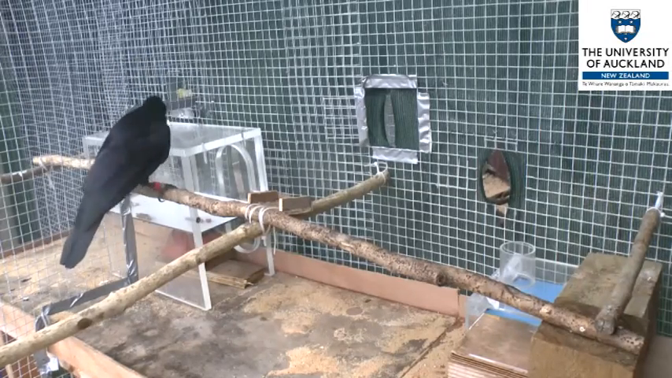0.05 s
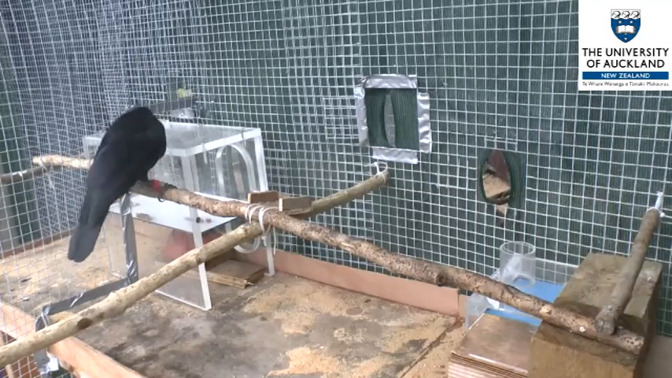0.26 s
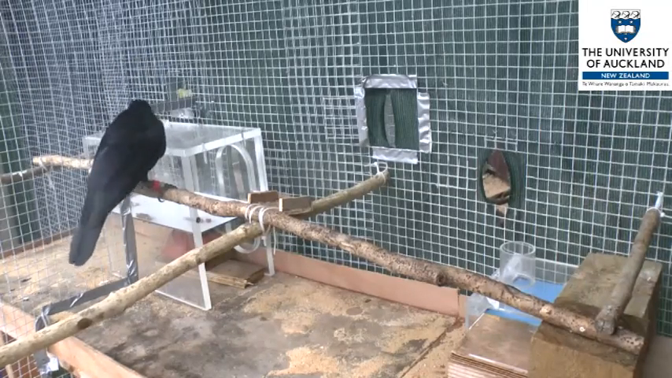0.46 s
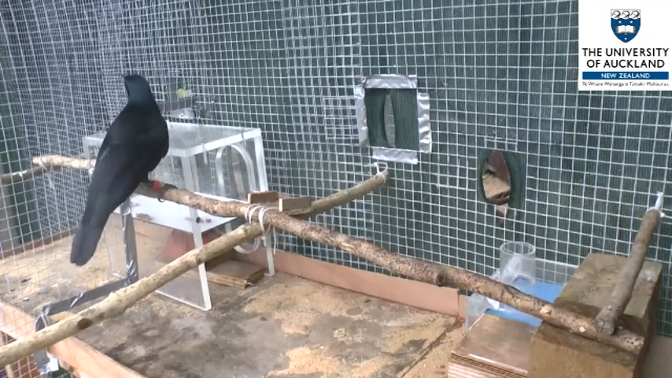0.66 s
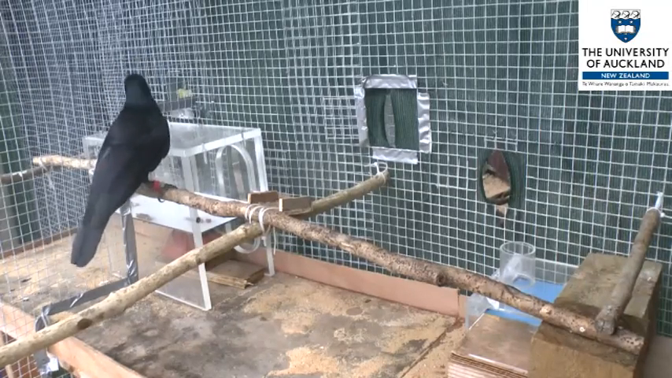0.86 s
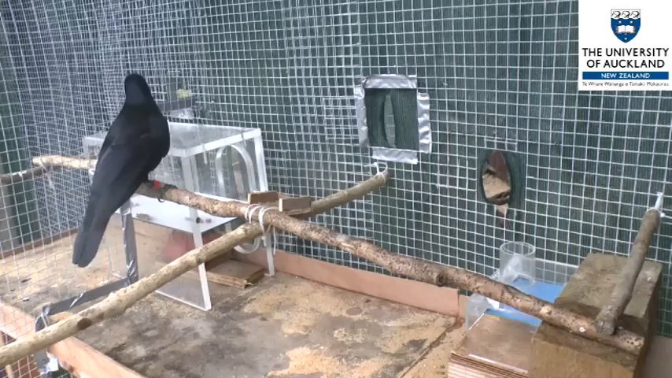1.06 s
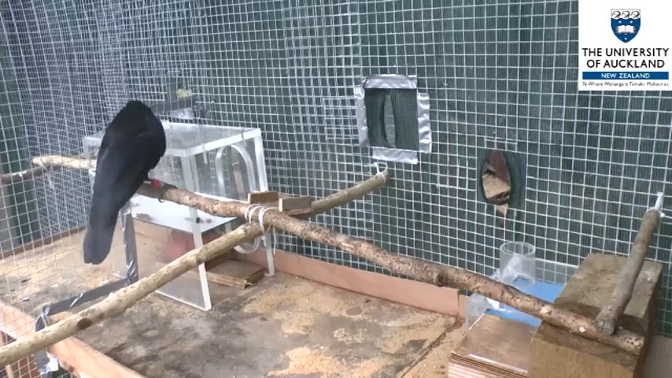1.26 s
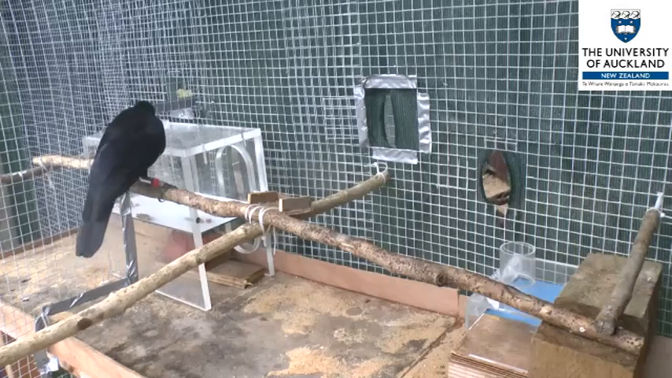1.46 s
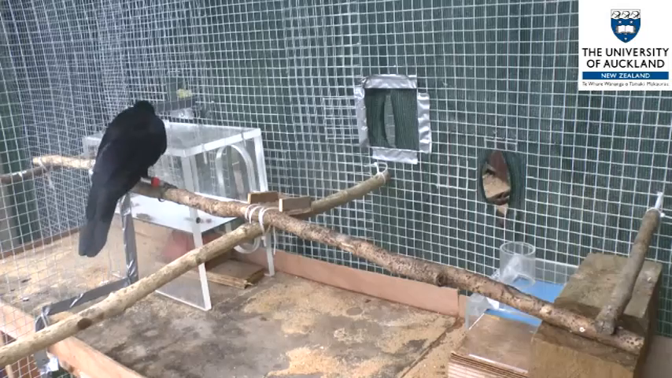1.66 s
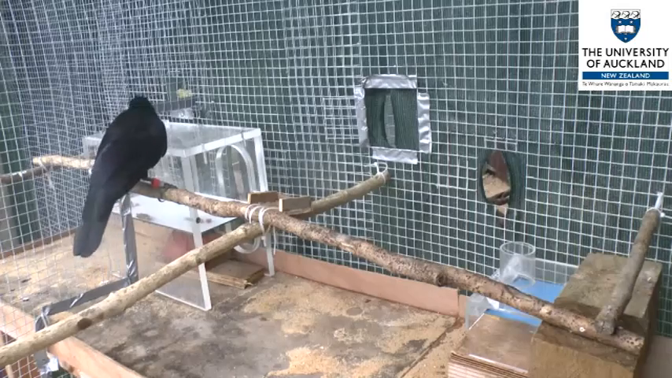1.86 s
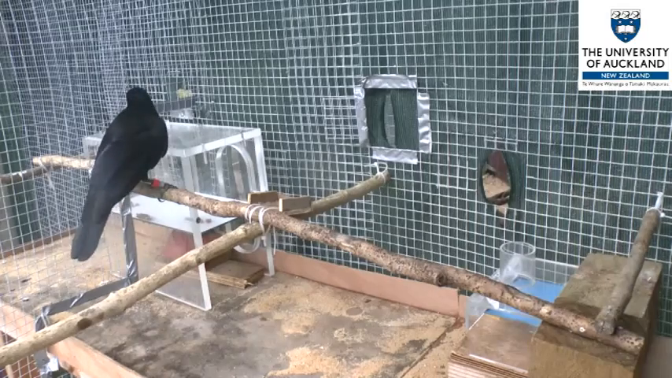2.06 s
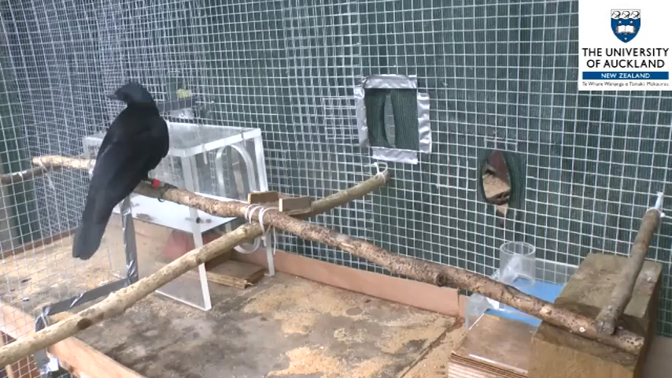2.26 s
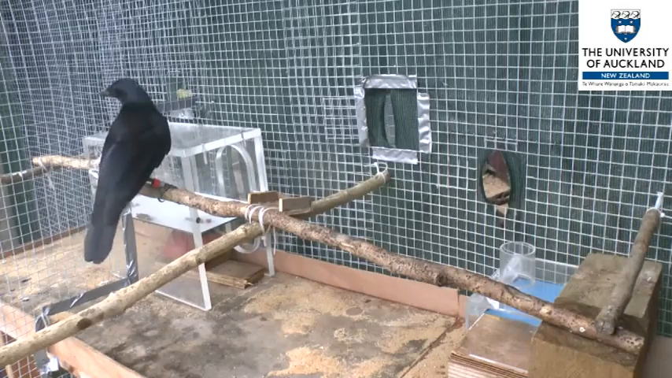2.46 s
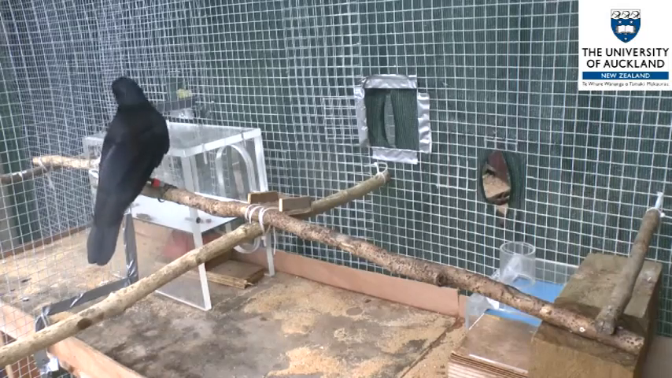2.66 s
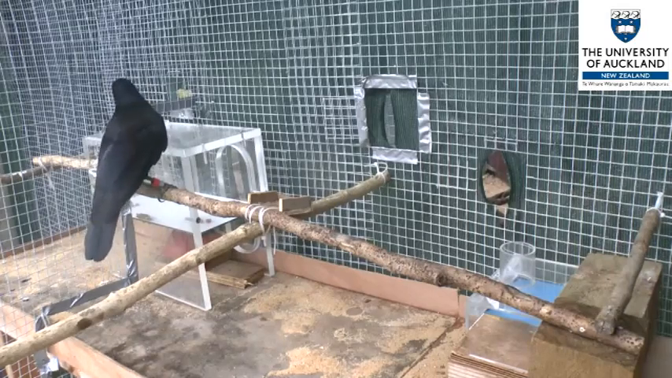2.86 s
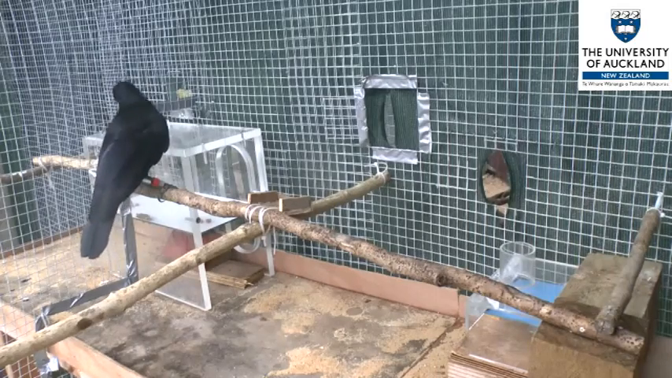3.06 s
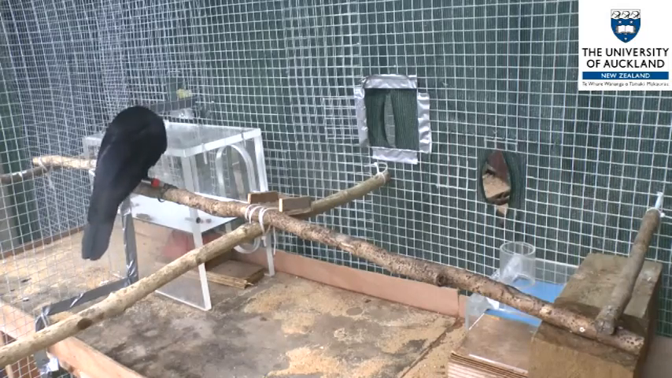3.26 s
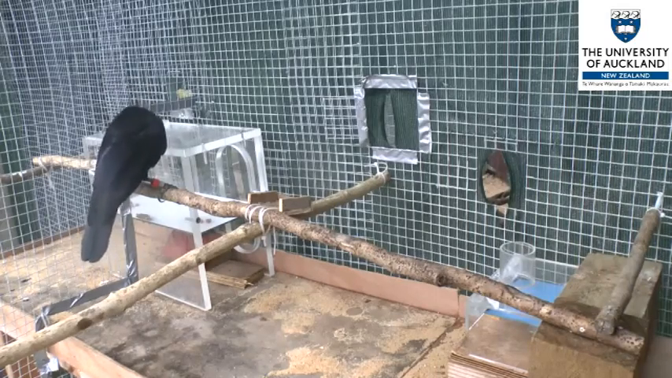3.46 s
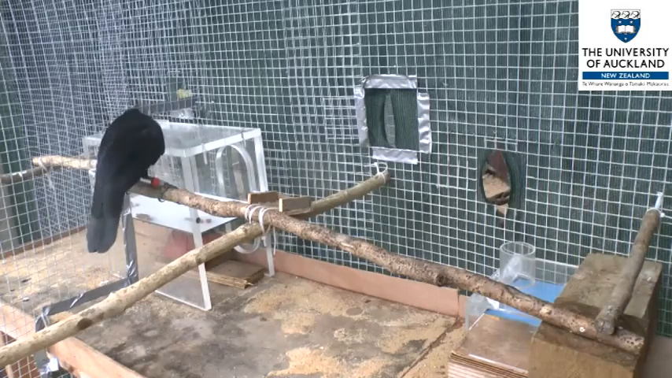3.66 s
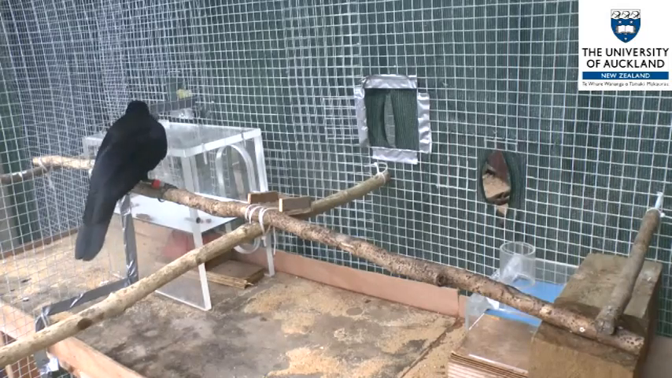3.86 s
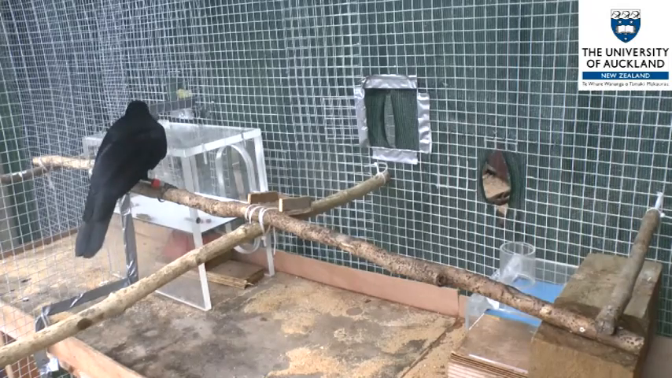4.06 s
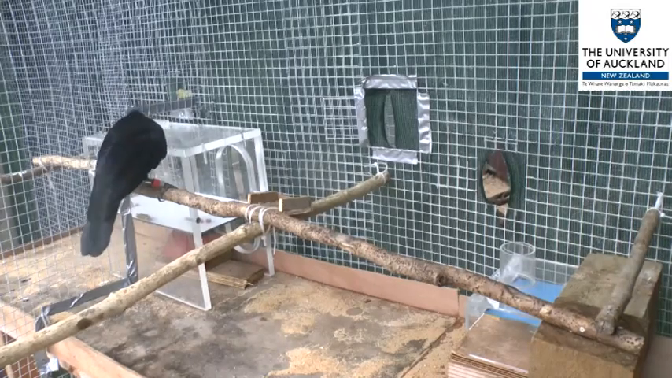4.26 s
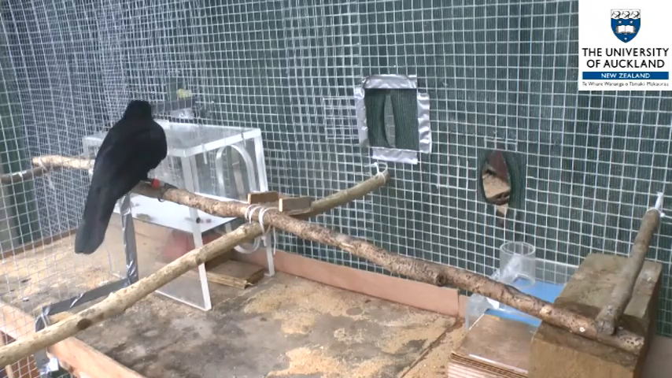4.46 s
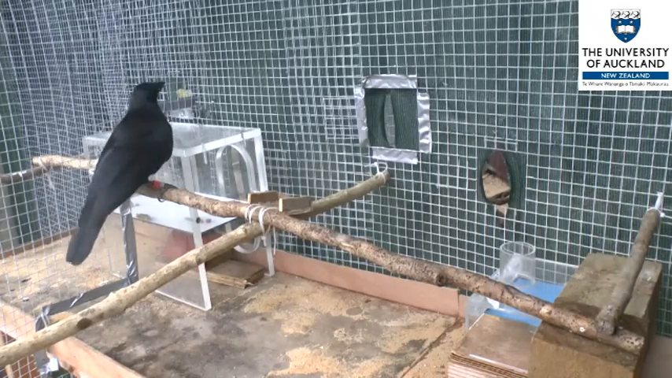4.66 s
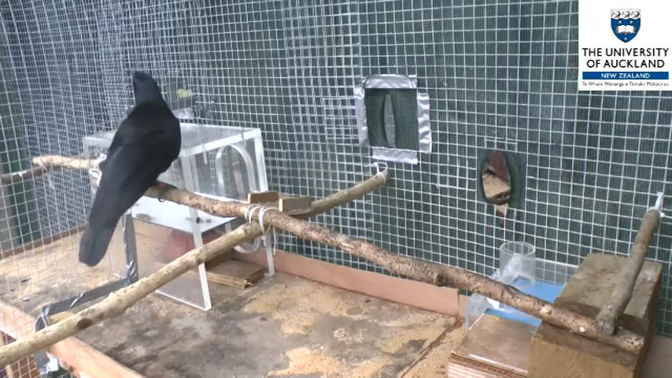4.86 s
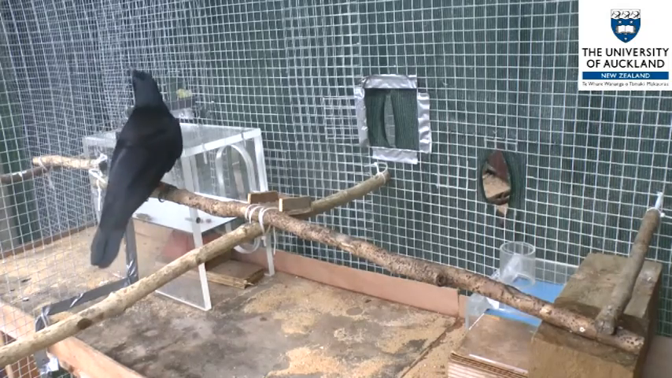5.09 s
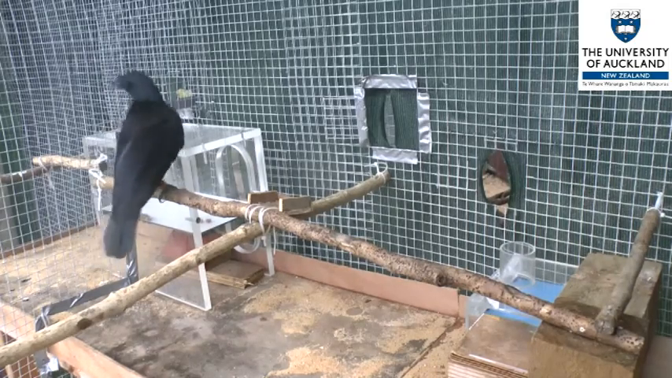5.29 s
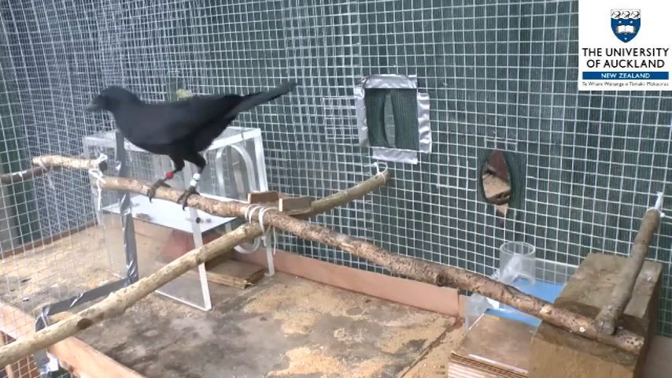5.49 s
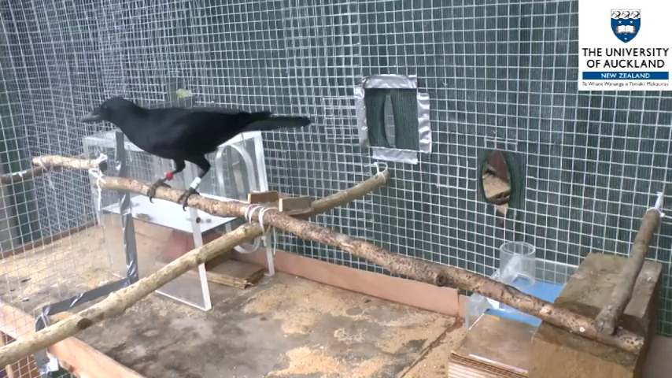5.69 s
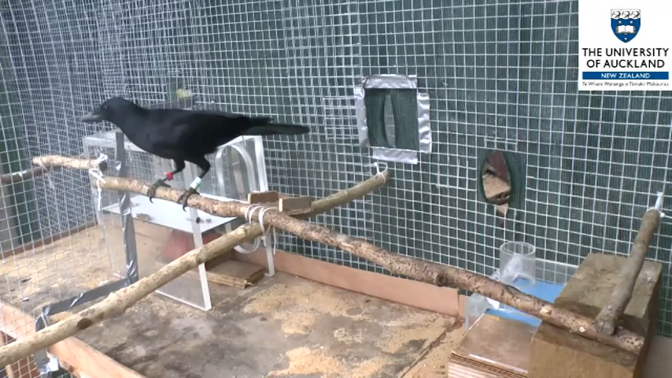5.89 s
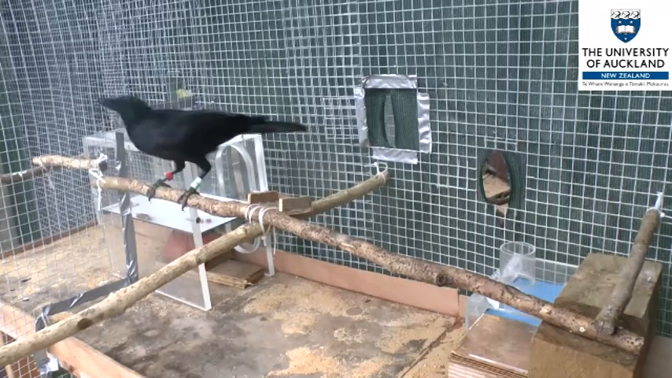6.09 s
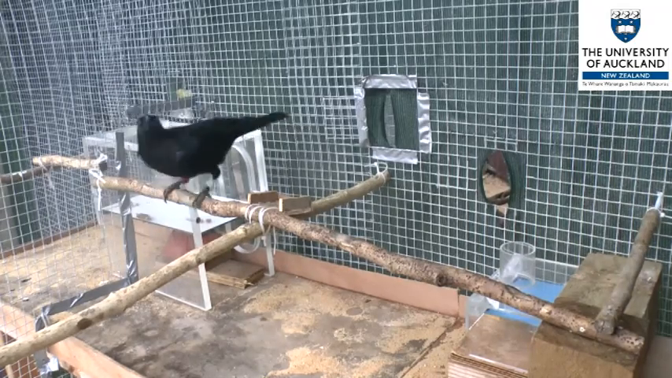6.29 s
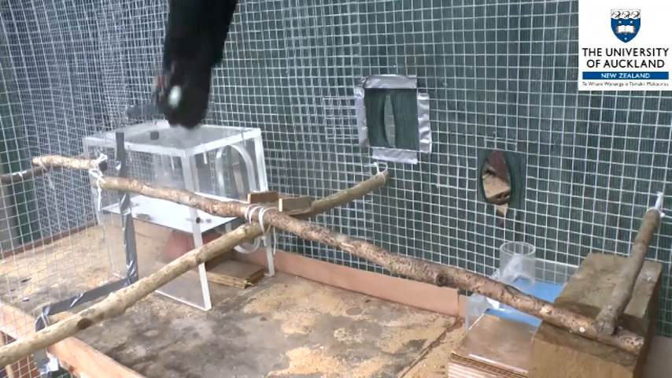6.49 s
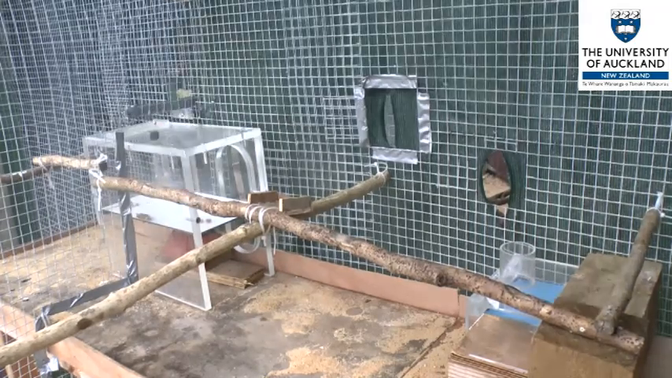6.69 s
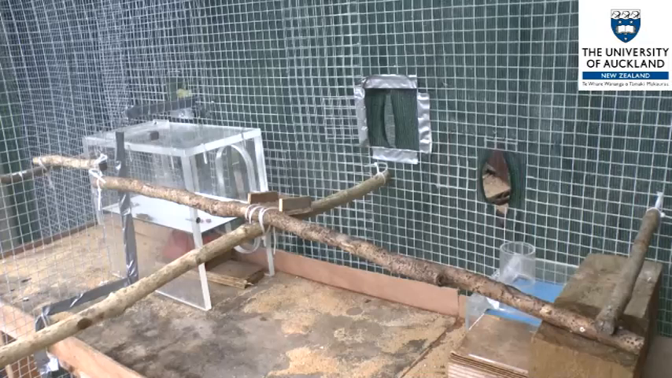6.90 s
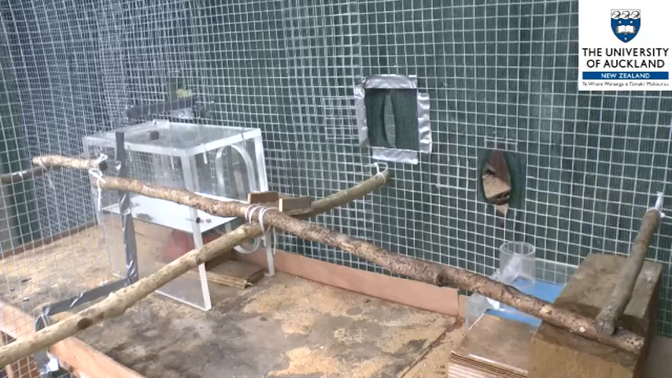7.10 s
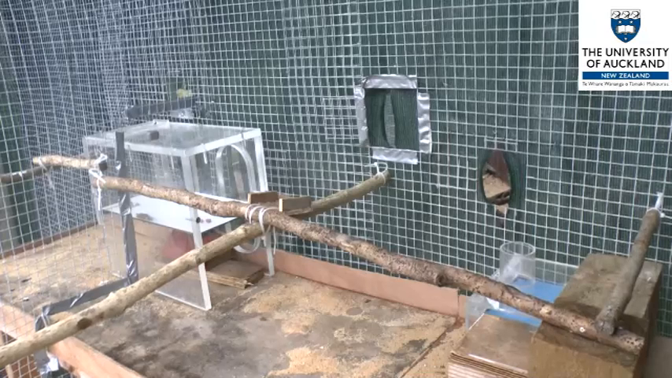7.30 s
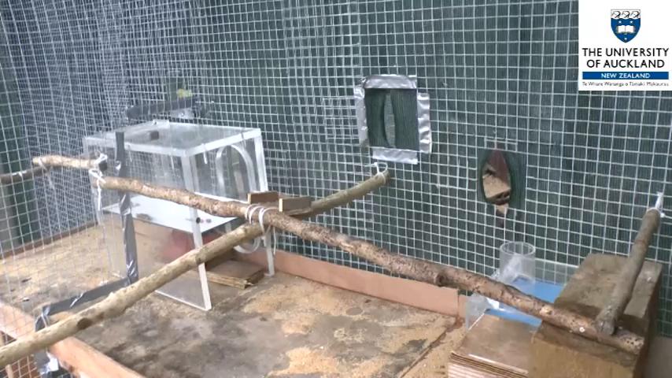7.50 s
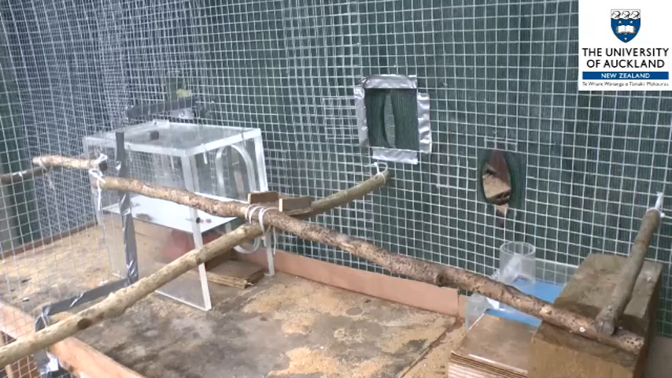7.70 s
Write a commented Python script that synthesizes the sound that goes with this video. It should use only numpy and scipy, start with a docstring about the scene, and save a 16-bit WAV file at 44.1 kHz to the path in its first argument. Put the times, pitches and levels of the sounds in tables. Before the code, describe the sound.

A close microphone in a small aviary with a short, light echo; behind everything lie soft air wash, a faint far drone in the first half, and a thin insect shimmer. A brief scrape opens, then two hard hollow raps on a plastic box at 0.3 s, with tiny taps after. Light claw ticks and a faint chirp come around 1.3-1.4 s. Strong knocks cluster at 1.8-2.0 s, then a quiet gap with faint distant chirps. From 3.4 to 3.6 s a quick rattling run of knocks and scraping, then one loud rap at 4.3 s and weaker taps. A distant whistle slides down at 4.5-4.85 s. At 5.0 and 5.4-5.7 s claws click, the perch thuds softly and feathers rustle. Wings swish from about 6.45 s; bright, crisp clatter, thumps and scuffs on wire mesh peak at 6.85, 7.18 and 7.35 s, then fade.

```python
"""Crow rattling a hollow box in an aviary

A crow taps and scrapes a hollow plastic box, whose modes ring at each knock, then flies to the wire mesh.
Claw ticks and feather rustle are shaped noise; landing thuds are noise that drives the timber frame's modes.
Behind it lie air noise, a far drone, a band of insects, faint chirps and a falling whistle (gliding tones).
Short random taps make the echo of the aviary."""
import sys
import numpy as np
from scipy import signal
from scipy.fft import rfft, irfft
from scipy.io import wavfile
from scipy.ndimage import uniform_filter1d

SR = 44100
rng = np.random.default_rng(int(sys.argv[2]) if len(sys.argv) > 2 else 0)


def digitize_waveform(pressure):
    """Quantize a signal to 16-bit integers and store it at the path in sys.argv[1].

    Rows of a 2-D input are taken as channels; values are limited to [-1, 1].
    """
    field = np.atleast_2d(pressure).T
    bounded = np.clip(field, -1, 1)
    quanta = np.round(bounded * 32767).astype(np.int16)
    wavfile.write(sys.argv[1], SR, quanta)


N = 341378  # length of the scene [samples]

# Ways the hollow plastic box rings: (pitch [Hz], strength [dB], time to fall 60 dB [s])
BOX_MODES = [(211.7, -8, 0.13), (247.3, -5.5, 0.06), (331.5, -1.5, 0.05), (428, 0.5, 0.072),
             (449.5, -5.5, 0.19), (543, 1.5, 0.038), (689, -20, 0.17), (758, -9.5, 0.058),
             (1031, -23.5, 0.069), (1091, -26, 0.25), (1197, -8, 0.027), (1395, -23, 0.1),
             (1779, 0.5, 0.027), (1793, -12, 0.089), (2094, -12, 0.021), (2250, -23, 0.043),
             (2294, -25, 0.091), (2400, -9, 0.013), (2755, -24.5, 0.044), (3245, -16, 0.038),
             (3716, -18, 0.037), (3650, -44, 0.053), (4057, -10.5, 0.023)]
BOX_HZ = np.array(BOX_MODES)[:, 0]
BOX_LOW, BOX_HARD = BOX_HZ < 900, BOX_HZ > 2000


def amp(db):
    """Turns decibels into a gain."""
    return 10 ** (np.asarray(db) / 20)


def evened(x):
    """Scales a signal to an average (rms) strength of 1."""
    return x / np.sqrt(np.mean(x ** 2) + 1e-20)


def read(points, hz):
    """Reads a curve of (Hz, value) points, with straight lines on a log-frequency axis."""
    f, value = np.transpose(points)
    return np.interp(np.log(hz + 1), np.log(f + 1), value)


def add(mix, s, sound, pan_db=0):
    """Adds a sound at time s; pan_db is how much louder it is on the left than on the right."""
    part = mix[:, round(s * SR):][:, :sound.shape[-1]]
    sides = amp(np.array([[.5], [-.5]]) * pan_db)
    part += sound[..., :part.shape[1]] * sides


def resonate(x, hz, width):
    """Shifts the pitch hz down to zero, smooths, and shifts back: a resonance of gain 1."""
    turn = np.exp(2j * np.pi * np.cumsum(hz * np.ones(len(x))) / SR)
    r = np.exp(-np.pi * width / SR)
    smooth = signal.lfilter([1 - r], [1, -r], x / turn)
    return 2 * (turn * smooth).real


def resonant_noise(hz, width):
    """Sends noise through the same resonance twice, for a band with steep sides; its rms is 1."""
    return evened(resonate(resonate(rng.standard_normal(N), hz, width), hz, width))


def slow(top_hz):
    """Random wavering of rms 1, with little above top_hz."""
    low_pass = signal.butter(2, top_hz, fs=SR, output="sos")
    return evened(signal.sosfilt(low_pass, rng.standard_normal(N)))


def swell(s, rise_s):
    """Grows from time s to 1 after rise_s, then ebbs."""
    u = np.maximum(np.arange(N) / SR - s, 0) / rise_s
    return u * np.exp(1 - u)


def patches(t, hz, steps, bands):
    """Random patches of loud and soft, rms 1, smoothed over time steps and frequency bands."""
    chance = rng.standard_normal((len(t), len(hz)))
    over_time = uniform_filter1d(chance, size=steps, axis=0)
    return evened(uniform_filter1d(over_time, size=bands, axis=1))


def sample_at(t):
    """Sample number at each time, kept inside the scene."""
    return np.minimum((t * SR).astype(int), N - 1)


def noise(db, size):
    """Two partly alike channels of noise, built from short spectra whose level is db(s, Hz)."""
    # How alike left and right are: (frequency [Hz], likeness [0 to 1])
    likeness = [(60, 0.84), (180, 0.66), (550, 0.51), (1650, 0.94), (4970, 0.99), (15000, 0.97)]
    hop = size // 4
    t = np.arange(N // hop + 5)[:, None] * hop / SR
    hz = np.fft.rfftfreq(size, 1 / SR)
    a, b, c, d = rng.standard_normal((len(t), len(hz), 4)).transpose(2, 0, 1)
    same = np.clip(read(likeness, hz), -1, 1)
    left = a + 1j * b
    right = same * left + np.sqrt(1 - same ** 2) * (c + 1j * d)
    z = np.array([left, right]) * amp(db(t, hz))
    return signal.istft(z.transpose(0, 2, 1), nperseg=size, noverlap=size - hop)[1][:, :N]


def ring(modes, extra_db, spread_db, length_s, rise_s, scatter):
    """One blow: the modes start together, with some chance in strength and phase, then die away."""
    hz, db, t60 = np.transpose(modes)[:, :, None]
    t = np.arange(round(length_s * SR)) / SR
    luck, phase = rng.standard_normal((2, len(modes), 1))
    strength = amp(db + extra_db + spread_db * luck - 60 * t / t60)
    tones = strength * np.sin(2 * np.pi * hz * t + scatter * phase)
    return tones.sum(0) * (1 - np.exp(-t / rise_s))


def burst(hz, octaves, rise_s, t60, chatter):
    """A dying puff of grainy noise round hz, with the energy of a tone of height 1 that dies alike."""
    t = np.arange(4096) / SR
    white, grains = rng.standard_normal((2, len(t)))
    grainy = white * np.exp(chatter * evened(uniform_filter1d(grains, size=30)))
    f = np.fft.rfftfreq(len(t), 1 / SR) + 1
    colour = 1 / (1 + (np.log2(f / hz) / max(octaves, .15)) ** 2) ** 2
    shape = amp(-60 * t / max(t60, .004)) * (1 - np.exp(-(t / max(rise_s, .0001)) ** 2))
    shape /= shape.max()
    x = irfft(rfft(grainy) * colour) * shape
    return x * np.linalg.norm(shape) / np.linalg.norm(x) / np.sqrt(2)


def box():
    """Each knock rings the box, gives a dry tock and a contact crack, and sets loose panels chattering."""
    # Beak knocks: (time [s], level [dB], modes from 370 to 900 Hz [dB], modes under 370 Hz [dB],
    # modes over 2000 Hz, tock and panels [dB])
    beak_knocks = [(0.3068, -15, -9.5, -8.5, -2.5), (0.3497, -20.5, -3.5, -4.5, -6),
                   (0.407, -53, -13, -4, 6), (0.4758, -37, -1, -4, -10), (0.6537, -46, 4, 12, -8),
                   (0.8817, -46.5, 0, 6, -14), (0.9895, -57, 5, 18, -2), (1.1339, -49, 1.5, 7.5, -22),
                   (1.4563, -37.5, 4, 4, -4.5), (1.8027, -11, -11.5, -9.5, -3.5),
                   (1.8236, -21, -5, -6, -10), (1.9229, -13, -13.5, -14.5, -0.1),
                   (2.001, -24, -11.5, -13, -0.3), (3.3423, -44.5, -0.5, 5, -12),
                   (3.4041, -18, -11.5, -8, -5), (3.4268, -18.5, -8, -5.5, -5), (3.4556, -31, -8, -2, 2),
                   (3.468, -16.5, -6, -7, -4.5), (3.528, -33, -11, -22, 8), (3.5324, -24, -5.5, -21, 6.5),
                   (3.5514, -25.5, -3, -24, -11), (3.5783, -25.5, -7, -16, -2), (3.6005, -27, -7, -9, -1.5),
                   (4.2982, -11, -9, -12.5, -5), (4.452, -29.5, -3, -5.5, -5),
                   (4.4612, -33.5, -0.5, -23, -1), (4.5296, -38, -5.5, -16, -21),
                   (4.6486, -47.5, 9, -14, -32), (4.8092, -45, 0, -6, -2), (4.8972, -58.5, 12, 10, 8),
                   (5.1097, -71.5, 26.5, -1, -7), (5.239, -68, 20, 20, -17)]
    deep_under_hz, crack_db = 370, -22.5
    middle_lean_db, middle_scatter_db = 0.5, 3  # lean to the left; how far it strays by where the beak lands
    out, modes = np.zeros((2, N)), np.array(BOX_MODES)
    outer = BOX_LOW | BOX_HARD
    # A foot or beak touching the box damps its late ringing.
    damping = np.exp(-(np.arange(round(.3 * SR)) / SR / 0.066) ** 2)
    for s, db, low_db, deep_db, hard_db in beak_knocks:
        fade = amp(-30 - 60 * np.arange(3000) / SR / 0.076)
        both, apart = rng.standard_normal((2, 3000)) * fade
        # The small panels lie left and right.
        chatter = both + np.array([[2.2], [-2.2]]) * np.diff(apart, prepend=0)
        chatter[:, 0] = 1  # the blow itself
        extra_db = np.where(BOX_HZ < deep_under_hz, deep_db, BOX_LOW * low_db + BOX_HARD * hard_db)[:, None]
        # Only the middle modes radiate to one side.
        middle_db = middle_lean_db + middle_scatter_db * rng.standard_normal()
        for group, lean_db in ((outer, -1.2), (~outer, middle_db)):
            tones = ring(modes[group], extra_db[group], spread_db=2.15, length_s=.3, rise_s=0.0021, scatter=0.72)
            rattled = signal.fftconvolve((tones * damping)[None], chatter, axes=1)
            add(out, s, amp(db) * rattled, lean_db)
        tock = amp(hard_db - 1.5) * burst(2320, octaves=0.21, rise_s=0.002, t60=0.013, chatter=0.3)
        panels = amp(hard_db - 15.5) * burst(2370, octaves=0.81, rise_s=0.00042, t60=0.12, chatter=0.254)
        crack = amp(crack_db) * burst(5430, octaves=0.6, rise_s=0.00016, t60=0.039, chatter=0.13)
        add(out, s, amp(db) * (tock + crack), -1.2)
        add(out, s, amp(db) * panels, 4.0 * rng.standard_normal())
    return out


def scrape():
    """The beak drags along the box: steady noise rings its modes, beside a band of rough noise."""
    # Drags: (start [s], length [s], level before the two parts are mixed [dB])
    drags = [(0, 0.098, -49.5), (3.411, 0.243, -53.5)]
    extra_db = (BOX_LOW * -1.5 + BOX_HARD * 11.0)[:, None]
    tones = ring(BOX_MODES, extra_db, spread_db=0, length_s=.2, rise_s=.001, scatter=3.)
    rubbed = signal.oaconvolve(rng.standard_normal(N), tones)[:N]
    rough = evened(resonate(rng.standard_normal(N), 1800, 1300))
    t, strength = np.arange(N) / SR, np.zeros(N)
    for s, length_s, db in drags:
        fade_in = (t - s) / .004 + 1
        fade_out = (s + length_s - t) / .02 + 1
        strength += amp(db) * np.clip(np.minimum(fade_in, fade_out), 0, 1)
    return strength * (0.68 * evened(rubbed) + 0.62 * rough)


def claws():
    """Sharp ticks are short noise bursts; a plucked wire sings with its own modes."""
    # Claw and beak ticks on wood and wire:
    # (time [s], level [dB], centre [Hz], width [octaves], time to fall 60 dB [s])
    tick_rows = [(0.0993, -40.5, 6150, 0.93, 0.074), (0.735, -49.5, 6920, 1.3, .02),
                 (0.852, -50.5, 6950, 0.47, .018), (1.3176, -37.5, 6160, 0.67, .015),
                 (1.3374, -43, 5300, 1.2, .016), (1.3954, -40, 2790, 1, 0.027),
                 (3.2483, -39.5, 3580, 1.3, 0.017), (3.255, -41.5, 2270, .87, 0.11),
                 (3.2747, -37.5, 5960, .52, 0.013), (3.39, -37.5, 2470, 1.3, 0.055),
                 (3.393, -35, 4650, 0.84, 0.028), (3.595, -33, 2500, 1.1, .022),
                 (3.6225, -30, 2500, 2.1, 0.023), (4.907, -45, 4400, .81, 0.031),
                 (4.949, -36.5, 7700, 0.33, 0.026), (5.005, -36.5, 5460, 1.05, 0.029),
                 (5.115, -45, 7000, 0.61, 0.038), (5.4005, -40.5, 2760, 0.22, 0.042),
                 (5.425, -49, 11700, 0.75, .015), (5.477, -41, 4500, 0.52, 0.019),
                 (5.525, -43, 7000, .6, .015), (5.671, -45, 6000, 0.98, 0.013),
                 (5.463, -42, 2970, 0.46, 0.022), (5.4879, -37, 6500, 0.78, 0.083),
                 (5.499, -37.5, 2860, 0.15, 0.054), (5.5468, -38.5, 5060, 1.4, .018),
                 (5.563, -30, 3380, 1.8, 0.056), (5.5732, -19.5, 9000, 0.85, 0.033),
                 (5.6354, -35.5, 5370, 0.72, 0.017), (5.6524, -44, 7140, 1.4, .026),
                 (6.2602, -50, 8950, 0.73, 0.011), (6.2967, -40.5, 3220, 1.8, 0.043),
                 (6.3136, -45, 3810, 1, .02), (6.333, -40.5, 2750, .86, 0.026),
                 (6.3433, -44, 5000, 1.8, 0.015), (6.362, -47, 8000, 1.1, .02),
                 (6.382, -43.5, 6300, 0.98, .02), (6.4043, -46, 8000, 1.1, .02),
                 (6.433, -42, 5550, 0.92, 0.019), (6.4496, -44, 5910, .91, .02),
                 (6.487, -30, 9460, 1.6, .02), (6.5088, -27, 3250, 0.91, 0.026),
                 (6.5207, -29.5, 7010, 1.2, 0.025), (6.5267, -25, 9900, 1.8, 0.028),
                 (6.539, -22, 7900, 0.67, 0.029), (6.586, -32, 7440, 1.1, .018),
                 (6.5963, -27, 6140, .49, 0.011), (6.62, -36, 8600, 0.72, .02),
                 (6.7262, -18, 12900, 2.2, 0.039), (6.816, -23.5, 6900, 1.4, 0.032),
                 (6.841, -13, 11400, 1.2, 0.038), (6.8468, -27, 5040, 0.8, .032),
                 (6.858, -30, 3460, 1.9, 0.032), (6.894, -33, 3100, 0.78, 0.012),
                 (6.9512, -27, 8340, 1.2, 0.026), (6.9594, -28, 7240, .74, 0.018),
                 (7.1404, -30.5, 7360, 0.56, 0.028), (7.1748, -12.5, 4830, 0.77, 0.015),
                 (7.2354, -25.5, 4850, 1.2, 0.031), (7.2643, -28, 7740, 1.1, 0.018),
                 (7.2735, -30, 8900, 1.1, 0.013), (7.2851, -19.5, 6860, 0.66, .014),
                 (7.289, -19, 9590, 3.1, 0.013), (7.315, -35, 3020, 1.3, 0.029),
                 (7.339, -20, 5550, 0.32, 0.011), (7.3428, -25.5, 5540, 5.3, 0.032),
                 (7.3485, -18, 6660, 1.1, 0.0052), (7.3559, -13, 7000, 0.78, 0.011),
                 (7.3712, -23, 5400, 0.14, 0.042), (7.4126, -34, 10500, 0.66, 0.013),
                 (7.433, -24, 10900, 0.31, 0.012), (7.45, -26, 11300, 1.1, 0.016),
                 (7.4835, -43, 10200, 0.5, .015), (7.497, -46, 9910, 0.39, .015)]
    # Plucks of a mesh wire: (time [s], level [dB])
    pluck_rows = [(6.952, -38.5)]
    # Ways the wire rings: (pitch [Hz], strength [dB], time to fall 60 dB [s])
    wire_modes = [(5230, -2, .25), (7060, 0, .2), (14420, -2, .2)]
    rise_s, side_scatter_db = 0.00095, 2.5  # attack; how far ticks stray left and right
    out = np.zeros((2, N))
    for s, db, hz, octaves, t60 in tick_rows:
        tick = amp(db) * burst(hz, octaves, rise_s, t60, chatter=0.062)
        add(out, s, tick, side_scatter_db * rng.standard_normal())
    for s, db in pluck_rows:
        add(out, s, amp(db) * ring(wire_modes, 0, spread_db=0, length_s=.3, rise_s=.002, scatter=3.))
    return out


def frame():
    """Each jolt, and the lumpy shaking after it, drive the low modes of the timber frame."""
    # Weight shifting or landing on perch or mesh: (time [s], jolt [dB], shaking that follows [dB],
    # time for the shaking to fall 60 dB [s], modes over 500 Hz [dB], sway of the deepest mode [dB])
    thud_rows = [(0.04, -70, -49.5, 0.93, -10, -57.5), (5.003, -40, -41.5, .55, -8.5, -50),
                 (5.401, -40.5, -51.5, 3.4, -13.5, -55), (5.574, -30.5, -38.5, 0.71, -6.5, -46.5),
                 (5.75, -63, -60, 0.66, 7, -46), (6.305, -41.5, -49.5, 1.3, -0.5, -50),
                 (6.501, -55, -47.5, 0.61, -7.5, -52.5), (6.66, -62, -55, 0.71, 1, -56.5),
                 (6.844, -39, -27, 0.31, -7, -42.5), (7.0, -60, -49.5, 1.06, -1, -71),
                 (7.175, -50, -45, 1.8, 1, -59), (7.311, -40, -43.5, 0.47, 1, -60),
                 (7.344, -28.5, -37, 0.41, 0.5, -43.5), (7.378, -43, -39.5, 0.3, 0, -51)]
    # Ways the frame rings: (pitch [Hz], strength [dB], time to fall 60 dB [s])
    frame_modes = [(158.5, -15.5, 0.27), (200, -13, 0.036), (245, -7, 0.055), (327, 1, 0.044),
                   (421.4, -2.5, 0.039), (580, -13, 0.029), (597, -7.5, 0.047), (756, 4.5, 0.015),
                   (804, -5, 0.049), (1134, -15, 0.054), (1374, -16, 0.058)]
    jolt_t60_s, sway_rise_s = 0.082, 0.092  # the deepest mode swells after the jolt, then ebbs
    deepest_hz, deepest_width_hz = 101.8, 9.4
    out, t, sway = np.zeros((2, N)), np.arange(SR) / SR, np.zeros(N)
    upper = np.array(frame_modes)[:, 0] > 500
    lumps = amp(1.75 * slow(35))
    for s, db, shake_db, t60, upper_db, sway_db in thud_rows:
        tones = ring(frame_modes, upper[:, None] * upper_db, spread_db=0, length_s=.3, rise_s=.001, scatter=3.)
        shaking = amp(shake_db - 60 * t / max(t60, .1)) * np.roll(lumps, -round(s * SR))[:SR]
        jolt = amp(db - 60 * t / jolt_t60_s)
        drive = rng.standard_normal(SR) * np.hypot(jolt, shaking)
        add(out, s, signal.oaconvolve(drive, tones / np.linalg.norm(tones)))
        sway = np.hypot(sway, amp(sway_db) * swell(s, sway_rise_s) ** 2)
    return out + sway * evened(resonate(rng.standard_normal(N), deepest_hz, deepest_width_hz))


def rustle():
    """Noise of feathers in patches, flickering in all bands at once as barbs slip."""
    # Feathers and feet scuffing, one row a swish: (loudest at [s], swell, at least 0.002 used [s],
    # level [dB], time to fall 60 dB, at least 0.03 used [s], treble, in full above 12 kHz [dB])
    swish_rows = [(1.318, 0.041, -53, 0.22, 2.5), (1.394, 0.018, -56.5, 0.65, -8),
                  (3.924, 0.025, -54.5, 0.36, -25), (4.778, 0.29, -62.5, 1.7, 0),
                  (4.948, 0.009, -50.5, .4, 0), (5.006, 0.015, -46, 0.19, -12), (5.06, .05, -59.5, 4.1, -6),
                  (5.498, 0.15, -48, 0.28, -2), (5.58, 0.068, -44, 0.67, -6), (5.78, 0.093, -59.5, 1.5, -8),
                  (5.92, .1, -52.5, 0.76, -11), (6.049, 0.24, -53.5, 0.27, 1), (6.31, 0.14, -55, 1.5, -3),
                  (6.466, .15, -52.5, 0.61, -18), (6.538, 0.11, -41.5, 0.15, 4),
                  (6.606, .015, -52, 0.58, -5), (6.67, .12, -40, .3, 8), (6.738, 0.11, -40, 0.33, -1),
                  (6.82, 0.04, -45, .3, -1), (6.845, 0.0091, -26, 0.2, -9), (6.88, .03, -42.5, 0.63, 3),
                  (6.96, .02, -46.5, 0.93, -5), (7.144, .01, -46, 0.035, 2), (7.177, 0.0016, -23, 0.05, -3),
                  (7.2, 0.012, -39, 0.66, -14), (7.239, 0.023, -39, 0.55, -1),
                  (7.28, 0.055, -45.5, 0.45, 5), (7.339, 0.0049, -28.5, .1, 5),
                  (7.376, 0.033, -26, 0.026, 0), (7.39, 0.026, -36.5, .5, -2), (7.55, 0.14, -53, 1.4, -16)]
    # Colour of the feather noise: (frequency [Hz], relative level [dB])
    feather_colour = [(530, -1), (900, -12), (1100, -4), (1420, -17.5), (1590, -2), (5100, 1.5),
                      (14500, -10.5), (16000, -4)]
    swell_db = 18  # a swish rises by this much over its swell
    flicker = slow(110)
    now = np.arange(0, N, 16) / SR  # one step every 16 samples
    power, treble = np.full(len(now), 1e-12), np.zeros(len(now))
    for s, rise_s, db, t60, treble_db in swish_rows:
        rising_db = swell_db * (now - s) / max(rise_s, .002)
        falling_db = -60 * (now - s) / max(t60, .03)
        swish = amp(db + np.minimum(rising_db, falling_db)) ** 2
        power += swish
        treble += swish * treble_db
    # The loudest swish sets the colour.
    treble, power = np.repeat([treble / power, power], 16, axis=1)[:, :N]

    def level_db(t, hz):
        at = sample_at(t)
        tilt = treble[at] * np.clip(np.log2(hz / 6000 + 1e-3), 0, 1)
        return read(feather_colour, hz) + tilt + 1.02 * flicker[at] + 2.1 * patches(t, hz, 5, 14)

    return np.sqrt(power) * evened(noise(level_db, size=256))


def gust():
    """A low push of air from the wings at the microphone as the bird flies: noise in a deep band."""
    start_s, rise_s, level_db, hz, width_hz = 6.45, .5, -59, 36, 30
    return amp(level_db) * swell(start_s, rise_s) ** 2 * resonant_noise(hz, width_hz)


def whistle():
    """A small bird far off: a clear, slightly trembling tone that falls in pitch."""
    # Path of the whistle: (time [s], pitch [Hz], level [dB])
    glide = [(4.44, 5220, -70), (4.561, 5010, -67), (4.604, 4870, -59), (4.661, 4020, -58),
             (4.728, 3356, -48.5), (4.778, 2986, -43.5), (4.815, 2785, -52), (4.83, 2530, -54),
             (4.86, 2430, -67)]
    s, hz, db = np.transpose(glide)
    t = np.arange(N) / SR
    pitch = np.interp(t, s, hz) + 40 * slow(117)
    tone = np.sqrt(2) * np.sin(2 * np.pi * np.cumsum(pitch) / SR)
    return tone * np.interp(t, s, amp(db), 0, 0) * (1 + 0.45 * slow(70))


def chirps():
    """Faint short notes: steady tones that swell and ebb."""
    # Notes: (start [s], level [dB], pitch [Hz])
    notes = [(1.4, -53, 2500), (2.2, -61, 2930), (2.315, -62, 3220), (2.45, -60, 3320)]
    rise_s = 0.0081
    t = np.arange(N) / SR
    return sum(amp(db) * swell(s, rise_s) ** 2 * np.sin(2 * np.pi * hz * t) for s, db, hz in notes)


def small_birds():
    """Whistle and chirps, with scattered echoes trailing behind as a blur."""
    first_s, t60, echo_db = 0.01, 0.26, -2.8  # first echo, time to fall 60 dB, level of all echoes together
    calls = whistle() + chirps()
    late = np.arange(SR // 4) / SR - first_s
    taps = rng.standard_normal(len(late)) * amp(-60 * late / t60) * (late > 0)
    return calls + amp(echo_db) * signal.oaconvolve(calls, taps / np.linalg.norm(taps))[:N]


def insects():
    """A throbbing band of insects: noise through a resonance, wavering in level."""
    hz, width_hz, level_db = 5120, 630, -68
    return resonant_noise(hz, width_hz) * amp(level_db + 2.0 * slow(14))


def drone():
    """A far drone comes and goes: noise in a narrow band."""
    # Level of the drone: (time [s], level [dB])
    drone_levels = [(0.0, -61), (0.6, -61), (1.27, -55.5), (1.95, -64.5), (2.28, -70), (3.4, -61),
                    (3.85, -67), (4.65, -105)]
    hz, width_hz = 580, 236
    db = np.interp(np.arange(N) / SR, *np.transpose(drone_levels))
    return amp(db) * resonant_noise(hz, width_hz)


def air():
    """Patchy low wash of air: coloured noise that slowly rises and falls."""
    # Colour of the air: (frequency [Hz], relative level [dB])
    air_colour = [(15, -52), (25, -38.5), (64, -14), (87, -2), (206, -8.5), (242, 0.5), (503, -11),
                  (607, -8.5), (1020, -25), (2550, -16.5), (4490, -20), (5000, -36), (6050, -22.5),
                  (14800, -28), (16000, -27.5)]
    air_db = -58
    drift_db = .8 * slow(1.5)

    def level_db(t, hz):
        patch_db = np.where(hz < 1500, 2.5, 1.2) * patches(t, hz, 10, 10)
        return read(air_colour, hz) + patch_db + drift_db[sample_at(t)]

    return amp(air_db) * evened(noise(level_db, size=1024))


def aviary(x):
    """Echo from sparse taps of random sign, each band dying at its own speed; the sides differ a little."""
    # How fast the echo dies: (frequency [Hz], time to fall 60 dB [s])
    echo_times = [(100, 0.37), (400, 0.15), (1000, 0.15), (3000, 0.12), (8000, 0.085)]
    taps = np.zeros((2, SR // 2))
    starts = np.arange(120, SR // 2 - 20, 20)
    at = starts + rng.integers(0, 20, (2, len(starts)))  # one tap somewhere in every 20 samples
    np.put_along_axis(taps, at, rng.choice([-1., 1.], at.shape), 1)
    taps = np.array([taps[0] + 0.052 * taps[1], taps[0] - 0.21 * taps[1]])
    hz, t, z = signal.stft(taps, SR, nperseg=256)
    fading = z * amp(-60 * t / read(echo_times, hz)[:, None])
    tail = signal.istft(fading, SR, nperseg=256)[1]
    return signal.fftconvolve(x, tail / np.linalg.norm(tail[0]), axes=1)[:, :N]


def scene():
    """The crow's sounds in the aviary over the sounds from outside."""
    beak, ticks, birds = box() + scrape(), claws(), small_birds()
    echo = aviary(amp(-10.5) * beak + amp(-13.5) * ticks + amp(-17) * birds)
    crow = beak + ticks + frame() + rustle() + gust()
    return crow + birds + echo + insects() + drone() + air()


def record(dry):
    """The microphone loses the deepest bass; a steep filter then ends the treble."""
    treble_edge_hz = 15900
    bass_cut = signal.butter(2, 30, "highpass", fs=SR, output="sos")
    thin = signal.sosfilt(bass_cut, dry)
    treble_cut = signal.firwin(511, treble_edge_hz, window=("kaiser", 9), fs=SR)
    return signal.oaconvolve(thin, treble_cut[None], "same")


dry = scene()
out = record(dry)
digitize_waveform(out)
```